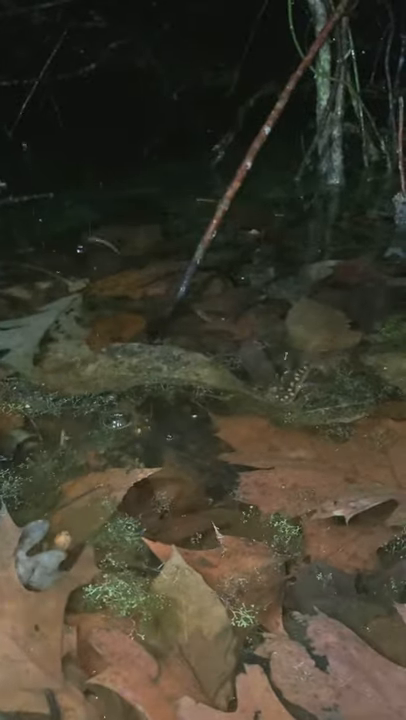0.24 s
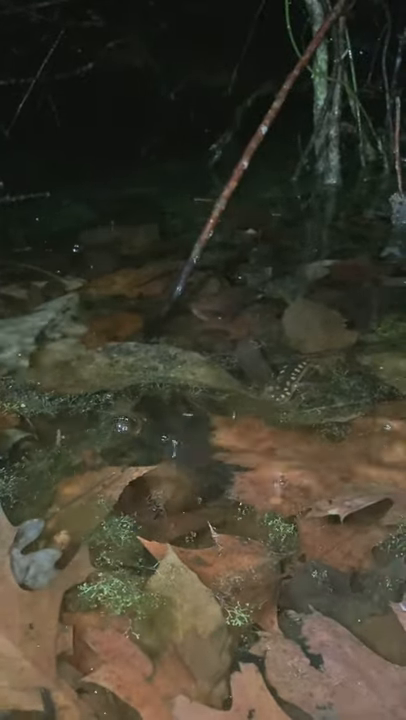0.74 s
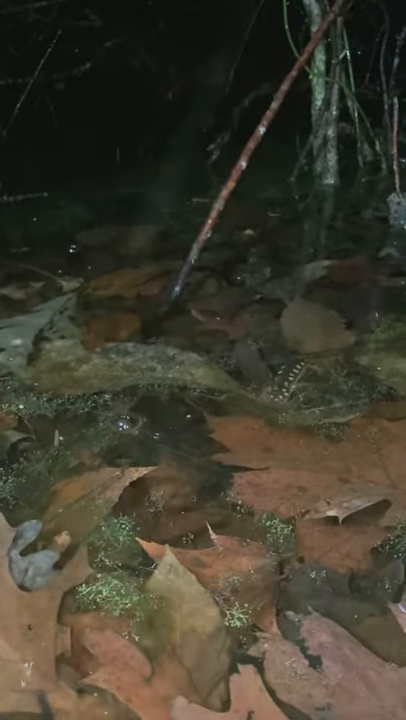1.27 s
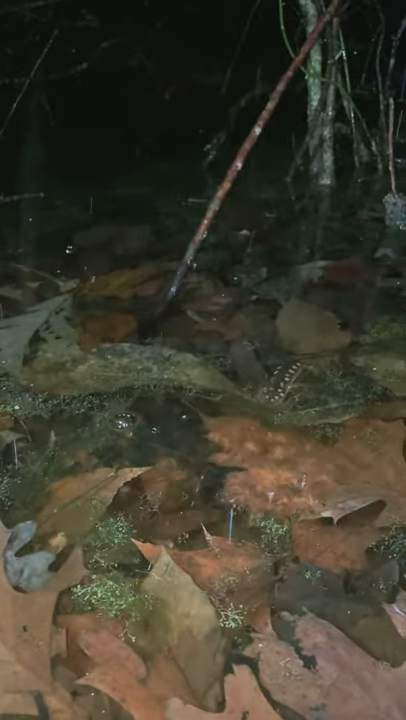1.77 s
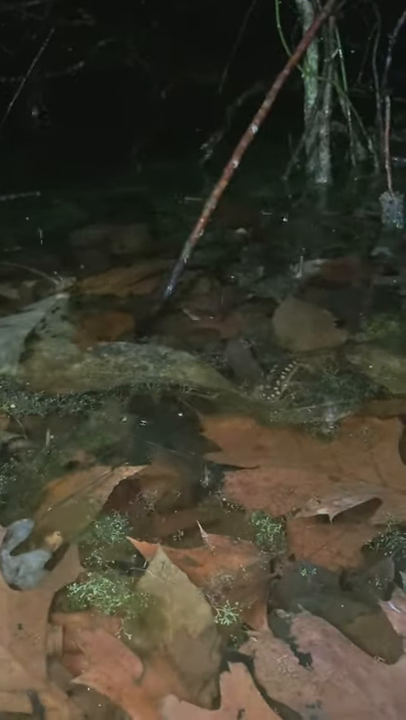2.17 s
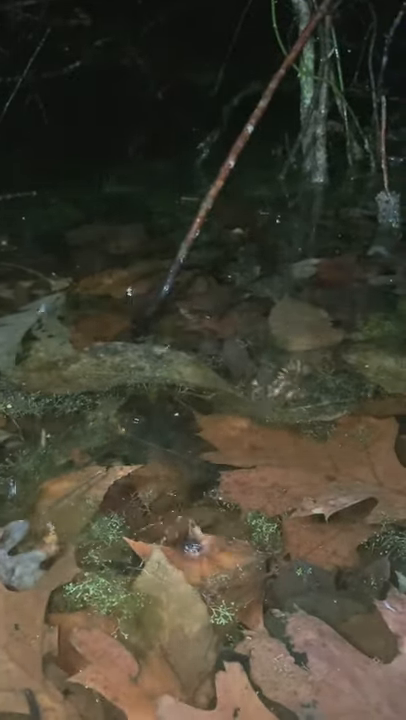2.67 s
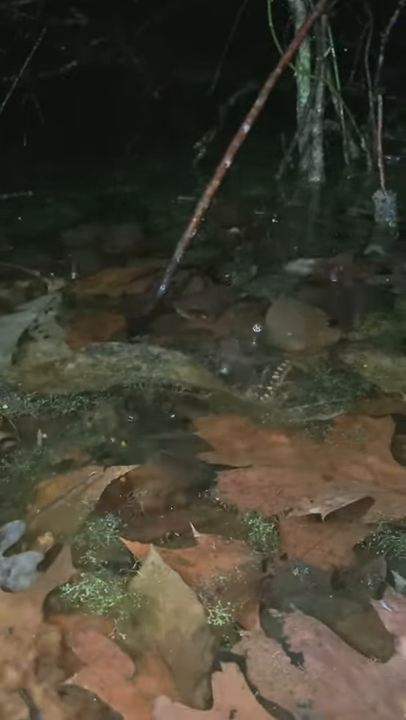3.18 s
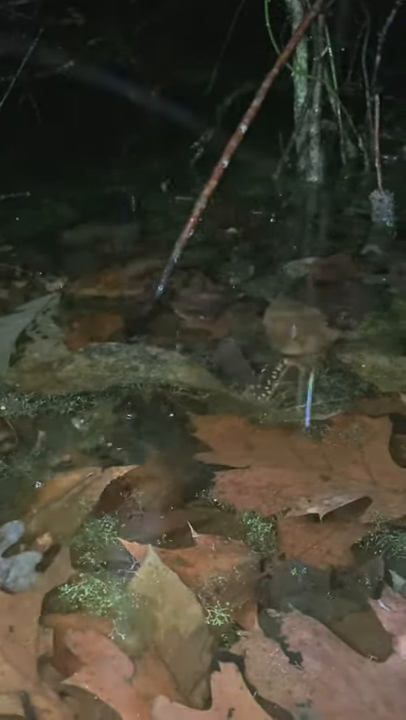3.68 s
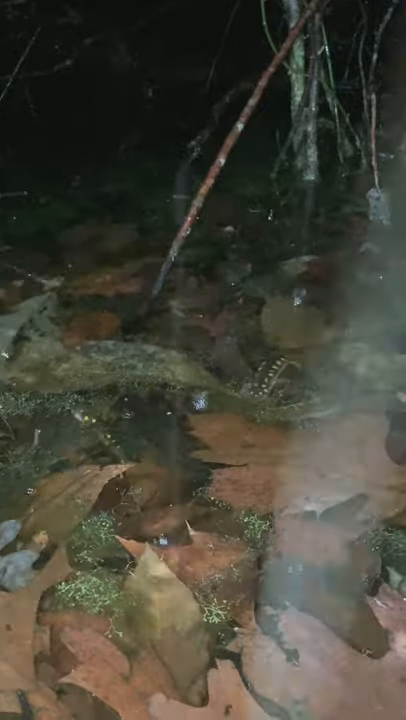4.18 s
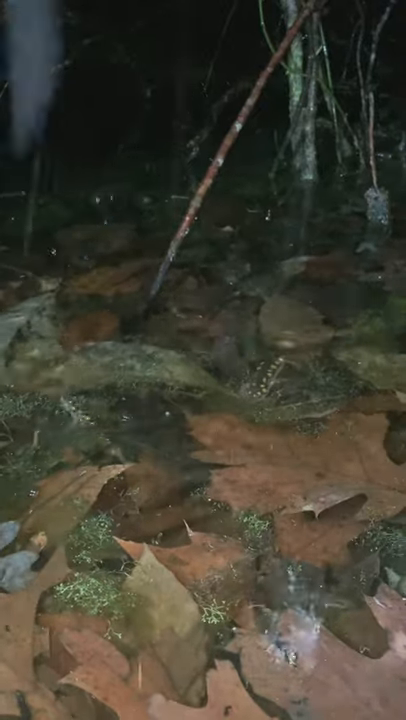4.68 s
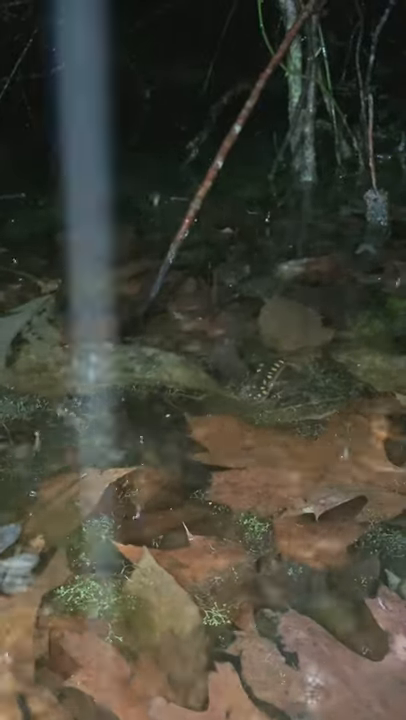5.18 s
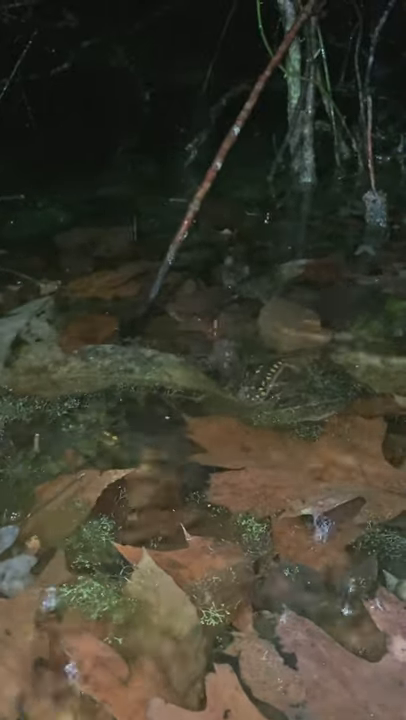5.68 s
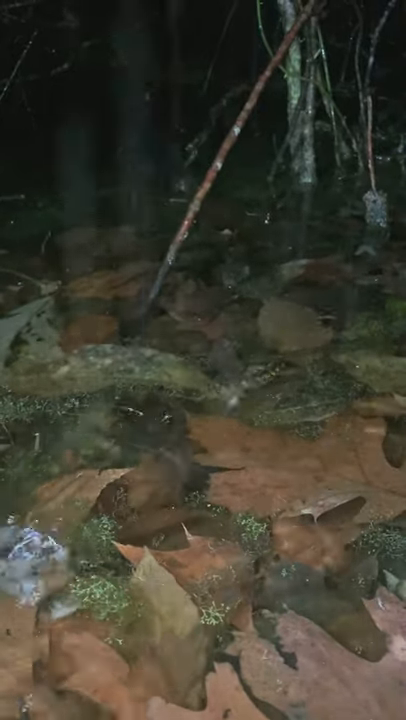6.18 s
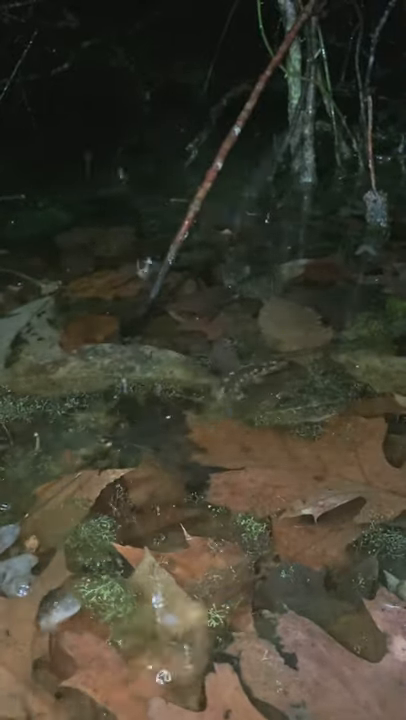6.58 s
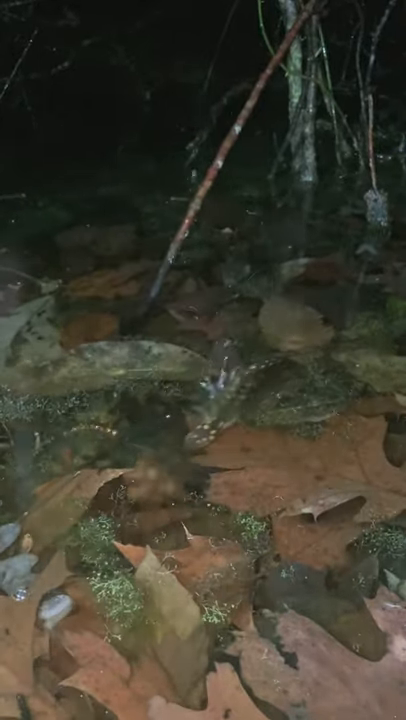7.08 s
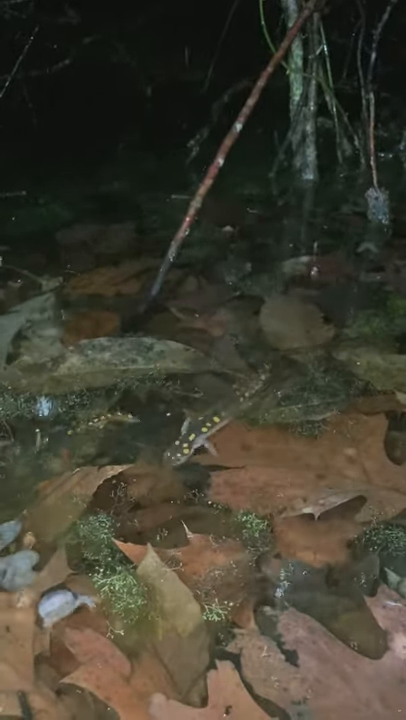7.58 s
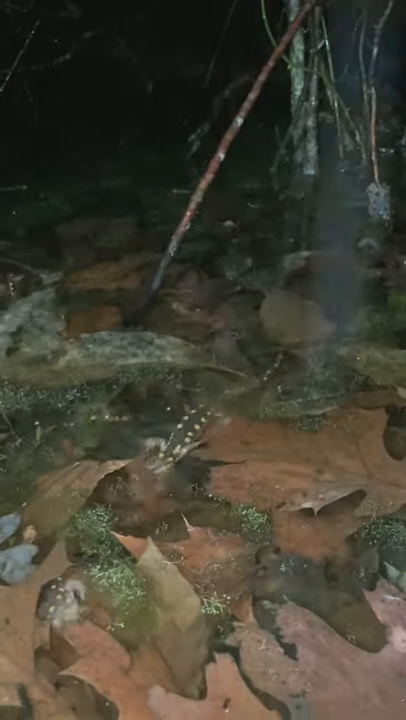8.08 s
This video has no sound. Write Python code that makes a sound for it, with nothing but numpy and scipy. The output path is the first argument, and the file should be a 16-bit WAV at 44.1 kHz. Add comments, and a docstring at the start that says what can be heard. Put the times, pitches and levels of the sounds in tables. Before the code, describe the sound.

A continuous chorus of shrill peeping frogs, near and far, with raindrops tapping over a soft hiss and one low thump.

```python
"""Peeping frogs in light night rain

Small frogs around a woodland pool whistle rising peeps with their vocal cords, near callers over a far
chorus, echoing off water and trunks. Drops tick on leaves, mud and water over a hiss of rain; two plop
on the stereo microphone's cover. Air rumbles at its ports, and something knocks the stand."""
import sys
import numpy as np
from scipy import signal
from scipy.fft import rfft, irfft
from scipy.io import wavfile
from scipy.ndimage import uniform_filter1d

SR = 44100
rng = np.random.default_rng(int(sys.argv[2]) if len(sys.argv) > 2 else 0)


def to_wav(sig):
    """Store sig (one row per channel, or 1-D mono) as 16-bit WAV at the path in sys.argv[1].

    Samples outside -1..1 are clipped; the rate is SR.
    """
    pcm = np.clip(np.atleast_2d(sig), -1, 1) * 32767
    pcm = np.round(pcm).astype(np.int16)
    wavfile.write(sys.argv[1], SR, pcm.T)  # frames by channels


N = 367794

# side partials by spot: pitch_ratio, relative_db
PARTIALS = {"a": [(.5, -38), (1.5, -34)], "d": [(.5, -27), (1.5, -40)], "g": [(3.5, -37)],
            "others": [(.5, -31), (1.5, -40)]}
# extra delay of the reflection off the water: delay_s (rows left, right)
REFLECTION_S = np.array([[.0036], [.0087]])
# rain spectrum: freq_hz, relative_db
RAIN_SPECTRUM = [(30, -32), (70, -12.5), (190, -9.5), (1300, -6), (2300, -11.5), (4000, -14), (6000, -19),
                 (15000, -18.5)]


def peep(length_s, start_hz, end_hz, bend, level_db, swell_db, pan_db, lead_s, phase_turns,
         notch_hz, reflection, partials):
    """One breath through the vocal cords: a rising whistle, dipping where the water's echo opposes it."""
    attack_s, release_s = .032, .028
    t = np.arange(0, length_s, 1 / SR)
    u = t / length_s
    linger = .4 * (1 - bend) * np.sin(2 * np.pi * u) / (2 * np.pi)  # slows both ends of the slide
    slide = u + bend * u * (1 - u) - linger
    scoop_hz = 300 * bend ** 2 * np.exp(-t / .02)
    hz = start_hz + (end_hz - start_hz) * slide - scoop_hz
    turns = np.cumsum(hz) / SR + phase_turns
    tone = 0
    for ratio, db in [(1, swell_db * (u - .5))] + partials:
        direct = ratio * (turns + np.outer([.5, -.5], hz) * lead_s)
        echo = direct - (ratio * hz - np.reshape(notch_hz, (2, 1))) * REFLECTION_S
        tone += gain(db) * (np.sin(2 * np.pi * direct) - reflection * np.sin(2 * np.pi * echo))
    ramp = np.clip(np.minimum(t / attack_s, (length_s - t) / release_s), 0, 1)
    envelope = np.sin(ramp * np.pi / 2) ** 2
    return tone * gain(level_db) / np.sqrt(1 + reflection ** 2) * envelope * pan(pan_db)


def near_frogs():
    """Callers at the pool's edge; each spot has its own slide, swell, direction and echo."""
    # start_s, spot, length_s, start_hz, level_db
    peeps = [(0, "c", .08, 2933, -34), (.071, "f", .16, 2730, -41), (.29, "f", 0.2, 2620, -35.5),
             (0.441, "d", 0.054, 2500, -43), (0.49, "b", 0.25, 2600, -36.5), (.965, "c", .085, 3020, -34),
             (.118, "c", .08, 2810, -30), (0.639, "g", .15, 2908, -37), (.716, "c", 0.18, 2710, -34.5),
             (0.745, "b", 0.2, 2592, -33), (.83, "c", 0.14, 2800, -36), (0.972, "a", 0.225, 2665, -22.5),
             (1.0, "d", 0.24, 2545, -32.5), (1.29, "c", 0.15, 2800, -33), (1.292, "d", 0.18, 2580, -35),
             (1.571, "c", 0.19, 2702, -38.5), (1.6, "f", 0.15, 2624, -41), (1.945, "b", 0.3, 2585, -33),
             (2.053, "d", 0.27, 2572, -34), (2.09, "b", 0.27, 2570, -33.5), (2.292, "c", .26, 2717, -38),
             (2.322, "b", .22, 2480, -43), (2.39, "c", 0.21, 2880, -41), (2.6, "f", .22, 2604, -41.5),
             (2.898, "f", 0.15, 2480, -46), (2.795, "c", 0.2, 2698, -32.5), (2.966, "b", .22, 2595, -38),
             (3.0, "c", 0.26, 2870, -35.5), (3.138, "b", 0.26, 2565, -34.5), (3.165, "c", 0.2, 2728, -32.5),
             (3.215, "b", .12, 2548, -34.5), (3.293, "d", 0.1, 2620, -28), (3.336, "a", .227, 2665, -20),
             (3.4, "d", .2, 2495, -35), (3.49, "c", .11, 2880, -33), (3.668, "e", 0.187, 2390, -30.5),
             (4.306, "b", 0.13, 2700, -39.5), (4.374, "f", .22, 2690, -38.5),
             (4.517, "f", 0.27, 2624, -39.5), (4.57, "b", .2, 2598, -34), (4.46, "f", 0.2, 2830, -39),
             (4.62, "c", .11, 2920, -35), (4.78, "d", 0.086, 2460, -40), (4.81, "d", 0.167, 2586, -36),
             (4.775, "a", .225, 2665, -23), (5.19, "f", .14, 2637, -42.5), (5.308, "c", 0.2, 2760, -37),
             (5.719, "f", 0.17, 2626, -37), (5.781, "b", 0.19, 2620, -32.5), (5.93, "c", .14, 2852, -35),
             (6.19, "f", .14, 2760, -38), (6.406, "c", 0.19, 2657, -36), (6.645, "g", 0.185, 2500, -28.5),
             (6.868, "c", 0.19, 2690, -38), (6.862, "d", 0.23, 2607, -27.5),
             (6.926, "b", 0.23, 2597, -37.5), (7.1, "f", 0.21, 2640, -40), (7.17, "c", .14, 2880, -37),
             (6.71, "c", .11, 2830, -40), (7.465, "b", 0.15, 2640, -35), (7.575, "a", 0.22, 2660, -36),
             (7.66, "c", .15, 2690, -38), (7.6, "d", 0.23, 2477, -42), (7.84, "c", 0.14, 2710, -36),
             (7.93, "d", 0.089, 2670, -39), (7.97, "c", 0.13, 3010, -44), (8.138, "b", .12, 2810, -36),
             (8.18, "d", .12, 2710, -39.5)]
    # by spot: slide_hz (per 0.2 s peep), bend, swell_db, pan_db, left_lead_s, echo_db,
    # left_notch_hz, right_notch_hz, reflection_gain
    spots = {"a": (445, .01, 10, 2.5, .000128, -14, 2788, 2925, .55),
             "b": (335, .12, -1, -1.5, .00009, -4, 2830, 2870, .35),
             "c": (320, .3, 1, 1.5, -.00012, -4, 2860, 2800, .35),
             "d": (305, .2, 4, -5, -.00014, -5, 2690, 2835, .4),
             "f": (350, .2, -2, 1.5, -.00003, -4, 2880, 2830, .35),
             "e": (222, .98, 7, 0, -.00003, -16, 2580, 2380, .2),
             "g": (150, .4, -4, -2, -.00004, -16, 2625, 2570, .25)}
    direct, echo_send = np.zeros((2, 2, N))
    for (start_s, spot, length_s, start_hz, level_db), phase in zip(peeps, rng.random(len(peeps))):
        slide_hz, bend, swell_db, pan_db, lead_s, echo_db, *notch_hz, reflection = spots[spot]
        end_hz = start_hz + slide_hz * (length_s / .2) ** .5  # longer peeps slide further
        call = peep(length_s, start_hz, end_hz, bend, level_db, swell_db, pan_db, lead_s, phase,
                    notch_hz, reflection, PARTIALS.get(spot, PARTIALS["others"]))
        add(direct, start_s, call)
        add(echo_send, start_s, gain(echo_db) * call)
    return direct + tree_echoes(echo_send, t60_s=.23)


def far_frogs(count=700, rms_db=-40.5):
    """A chorus of mixed sizes all around, heard mostly through its echoes."""
    calls = np.zeros((2, N + SR))  # 1 s lead-in: the chorus is already under way
    draws = np.hstack([rng.random((count, 3)), rng.standard_normal((count, 4))])
    for k, (late, smallness, phase, detune, loudness, side, lead) in enumerate(draws):
        start_hz = 2670 + 65 * detune + 150 * (smallness - .5)
        call = peep(.22 - .0707 * smallness, start_hz, start_hz + 315, bend=.301,
                    level_db=2.6 * loudness, swell_db=-2.5, pan_db=1.4 * side - 1.1,
                    lead_s=.00011 + .00009 * lead, phase_turns=phase,
                    notch_hz=phase / REFLECTION_S, reflection=.4, partials=PARTIALS["others"])
        add(calls, (k + late) / count * (N / SR + 1), call)
    chorus = calls + gain(2) * tree_echoes(calls, t60_s=.35)
    return gain(rms_db) * unit_rms(chorus)[:, SR:]


def tick(pitch_hz, bandwidth_ratio):
    """A drop's tap: a sharp start, then a few damped cycles of sagging pitch."""
    cycles = np.arange(1200) * pitch_hz / SR
    decay = np.exp(-1.9 * bandwidth_ratio * cycles)
    turns = np.cumsum(1 + bandwidth_ratio * (decay - .45)) * pitch_hz / SR
    tap = np.sin(2 * np.pi * turns) * (1 - np.exp(-cycles / .34)) * decay
    return tap / abs(tap).max()


def large_drops():
    """Close impacts; those on water lie level with the ports, the rest arrive from above."""
    # time_s, surface, peak_db, pitch_hz
    impacts = [(.6747, "leaf", -23.5, 6600), (.6065, "leaf", -29, 2000), (.706, "leaf", -33, 600),
               (.871, "leaf", -33, 1190), (1.0587, "leaf", -27, 9500), (2.1822, "leaf", -25, 14400),
               (2.6, "leaf", -29, 2100), (2.766, "leaf", -30, 1500), (3.0128, "mud", -27, 8500),
               (3.2138, "leaf", -25, 8400), (3.476, "leaf", -28, 2100), (3.548, "leaf", -27, 1710),
               (4.2874, "leaf", -28, 7100), (4.8571, "leaf", -26, 8200), (4.8926, "water", -32, 5000),
               (5.5285, "leaf", -27, 8300), (5.761, "leaf", -30, 904), (6.1621, "leaf", -28, 7700),
               (6.2853, "mud", -24, 13000), (6.431, "leaf", -31, 1300), (6.5507, "leaf", -27, 14500),
               (6.6126, "leaf", -26, 14500), (6.8276, "leaf", -26, 8500), (7.166, "leaf", -30, 1770),
               (7.6537, "leaf", -27, 14300), (8.3167, "leaf", -26, 14100), (0.787, "leaf", -18, 9600),
               (1.7484, "mud", -19, 11000), (2.28, "leaf", -37, 310), (3.3577, "leaf", -19.5, 9600),
               (3.449, "leaf", -40.5, 196), (3.4165, "water", -25, 4000), (3.6435, "water", -16.5, 2900),
               (3.6445, "mud", -22, 6500), (3.6447, "leaf", -27, 1270), (3.819, "leaf", -14, 8500),
               (3.8192, "water", -27, 4400), (3.9, "water", -28, 1910), (4.2221, "mud", -25.5, 1658),
               (4.3, "mud", -12, 15000), (4.4843, "water", -30, 4900), (4.4851, "leaf", -19, 1790),
               (4.6295, "water", -31, 1250), (4.893, "leaf", -20, 1860), (4.9148, "mud", -22.5, 1480),
               (5.0649, "mud", -27.5, 930), (5.192, "mud", -13.5, 15500), (5.3844, "leaf", -27, 947),
               (5.6, "water", -34.5, 650), (5.72, "water", -31, 1490), (5.9066, "leaf", -29, 1060),
               (7.45, "mud", -19.5, 6940), (7.5756, "leaf", -25, 1500), (7.343, "leaf", -24, 4500),
               (7.879, "mud", -24, 5000), (8.0449, "leaf", -13, 10000), (8.1797, "leaf", -21.5, 1240)]
    # by surface: bandwidth_ratio (to pitch)
    bandwidths = {"water": 0.15, "leaf": 0.58, "mud": 1.02}
    above, on_water = np.zeros((2, 2, N))
    for time_s, surface, peak_db, pitch_hz in impacts:
        tap = gain(peak_db) * tick(pitch_hz, bandwidths[surface]) * pan(0)
        add(on_water if surface == "water" else above, time_s - .64 / pitch_hz, tap)
    direct = port_shift(above) + on_water
    return direct + gain(-11) * tree_echoes(direct, t60_s=.03, length_s=.1, density=.3)


def cover_plops(rise_s=.0007):
    """Heavy drops bend the microphone's cover: a tone that falls fast as it dies."""
    # start_s, level_db, start_hz, end_hz, fall_s, t60_s
    plops = [(.692, -24, 2700, 1150, .0008, .022), (6.2459, -16, 3300, 230, .0012, .022)]
    t, out = np.arange(2000) / SR, np.zeros((2, N))
    for start_s, level_db, start_hz, end_hz, fall_s, t60_s in plops:
        turns = np.cumsum(end_hz + (start_hz - end_hz) * np.exp(-t / fall_s)) / SR
        envelope = gain(level_db - 60 * t / t60_s) * (1 - np.exp(-(t / rise_s) ** 2))
        add(out, start_s, envelope * np.sin(2 * np.pi * turns) * pan(0))
    return out


def stand_knocks():
    """Blows on the stand: a short low push, then a slower sway that builds and dies."""
    # start_s, gain_db, pan_db
    blows = [(3.665, -14.5, 11.5), (3.934, -38.5, 14)]
    # freq_hz, relative_db, rise_s, t60_s
    modes = [(65.5, 2.5, 0.0046, 0.12), (43.1, 3.5, 0.13, 0.69), (153, -11.5, 0.0058, 0.12)]
    t, out = np.arange(SR) / SR, np.zeros((2, N))
    lag_rad = np.array([[0], [1.8]])  # right port trails
    ring = 0
    for hz, db, rise_s, t60_s in modes:
        envelope = gain(db - 60 * t / t60_s) * (1 - np.exp(-(t / rise_s) ** 2))
        ring += envelope * np.sin(2 * np.pi * hz * t - lag_rad)
    for start_s, gain_db, pan_db in blows:
        add(out, start_s, gain(gain_db) * ring * pan(pan_db))
    return out


def patter(rate_per_s=900, spread_db=4.5, rms_db=-51):
    """Small drops at random, most of them faint, ringing at 40 pitches."""
    strength = gain(spread_db * np.minimum(rng.exponential(1, N), 4))
    hits = strength * (rng.random(N) < rate_per_s / SR)
    pitch_index, taps = rng.integers(0, 40, N), np.zeros((2, N))
    for k, hz in enumerate(300 + 2.5 * np.arange(6, 46) ** 2.28):
        tap = tick(hz, rng.uniform(.22, .9)) * gain(log_interp(RAIN_SPECTRUM, hz)) * hz ** .9
        taps += signal.oaconvolve(hits * (pitch_index == k), tap)[:N] * pan(.94 * rng.standard_normal())
    echoes = gain(-7.5) * tree_echoes(taps, t60_s=.029, length_s=.1, density=.3)
    return gain(rms_db) * unit_rms(taps + echoes)


def rain_wash(rms_db=-49.5, corner_hz=1500):
    """Distant rain: flickering noise, patchier and slowly varying in level below the corner."""
    # freq_hz, left_right_coherence
    coherence_curve = [(60, 1), (300, 0.97), (1500, 0.13), (4000, 0.24), (5500, 1)]
    # low band: time_s, offset_db
    low_levels = [(0, -1), (3.3, -2.5), (3.9, 1.5), (6.3, 2), (6.8, -.5)]
    frames, hz = N // 256 + 5, np.fft.rfftfreq(1024, 1 / SR)
    left_re, left_im, other_re, other_im, patches = rng.standard_normal((frames, 513, 5)).T
    patches = unit_rms(uniform_filter1d(uniform_filter1d(patches, 14, 0), 8, 1))
    flicker = unit_rms(uniform_filter1d(rng.standard_normal(frames), 6))
    coherence = log_interp(coherence_curve, hz)[:, None]
    left = left_re + 1j * left_im
    right = coherence * left + np.sqrt(1 - coherence ** 2) * (other_re + 1j * other_im)
    low_share = 1 / (1 + (hz[:, None] / corner_hz) ** 2)
    low_db = np.interp(np.arange(frames) * 256 / SR, *np.transpose(low_levels))
    motion_db = low_share * low_db + (1.8 + 1.6 * low_share) * patches + 1.2 * flicker
    spectra = np.array([left, right]) * gain(log_interp(RAIN_SPECTRUM, hz)[:, None] + motion_db)
    wash = signal.istft(spectra, nperseg=1024, noverlap=768)[1][:, :N]
    return gain(rms_db) * unit_rms(wash)


def air_rumble():
    """Slow air stirring at the ports: low noise, mostly common to both."""
    # time_s, level_db
    levels = [(0, -63), (1.7, -60.5), (2.2, -55.5), (2.8, -66.5), (4, -56.5), (6.1, -57), (6.8, -59.5)]
    common, left, right = rng.standard_normal((3, N))
    band = signal.butter(3, [38, 150], "band", fs=SR, output="sos")
    rumble = unit_rms(signal.sosfilt(band, np.array([left, right]) + 3.9 * common))
    return rumble * gain(np.interp(np.arange(N) / SR, *np.transpose(levels))) * pan(2.4)


def tree_echoes(x, t60_s, length_s=.6, density=.03):
    """Echoes off trunks and water: sparse decaying taps of random sign, separate per channel."""
    shape = (2, round(length_s * SR))
    taps = rng.choice([-1., 1.], shape) * (rng.random(shape) < density)
    taps *= gain(-60 * np.arange(shape[1]) / SR / t60_s)
    taps /= np.linalg.norm(taps, axis=1)[:, None]
    return signal.fftconvolve(x, taps, axes=1)[:, :x.shape[1]]


def port_shift(x):
    """Phase shift between the microphone's two ports for sound from above."""
    # freq_hz, right_lead_rad
    phase_curve = [(0, -1.5), (700, 1.5), (2000, 0.55), (3500, 4), (5500, 3), (15000, -6.5)]
    lead_rad = np.interp(np.fft.rfftfreq(N, 1 / SR), *np.transpose(phase_curve))
    return np.array([x[0], irfft(rfft(x[1]) * np.exp(1j * lead_rad), N)])


def gain(db):
    """Decibels to amplitude."""
    return 10 ** (np.asarray(db) / 20)


def pan(db):
    """Channel gains for a left-minus-right level difference."""
    return gain([[db / 2], [-db / 2]])


def unit_rms(x):
    """Scale to rms 1."""
    return x / np.sqrt(np.mean(x ** 2) + 1e-20)


def log_interp(curve, hz):
    """Read a curve on a log-frequency axis."""
    knots_hz, values = np.transpose(curve)
    return np.interp(np.log(hz + 1), np.log(knots_hz + 1), values)


def add(mix, start_s, sound):
    """Mix in a stereo sound."""
    span = mix[:, round(start_s * SR):][:, :sound.shape[1]]
    span += sound[:, :span.shape[1]]


def scene():
    """Frogs, rain, air and knocks at the two ports."""
    return (near_frogs() + far_frogs() + large_drops()
            + port_shift(rain_wash() + patter() + cover_plops()) + air_rumble() + stand_knocks())


def record(dry):
    """Steep low-pass."""
    cutoff_hz = 16050
    lowpass = signal.firwin(511, cutoff_hz, window=("kaiser", 9), fs=SR)
    return signal.oaconvolve(dry, lowpass[None], "same")


dry = scene()
out = record(dry)
to_wav(out)
```